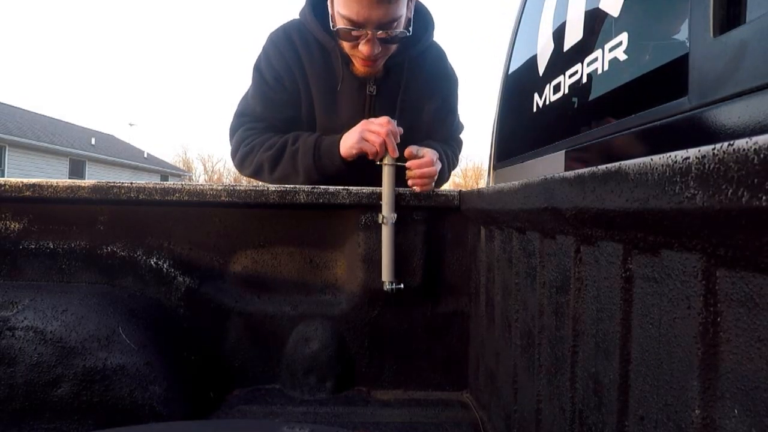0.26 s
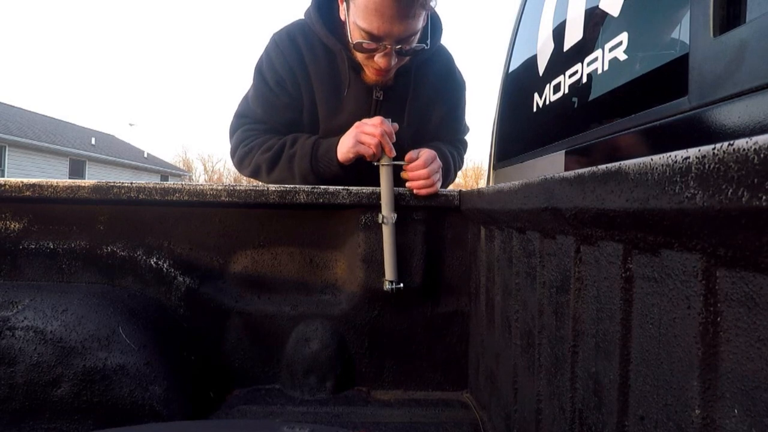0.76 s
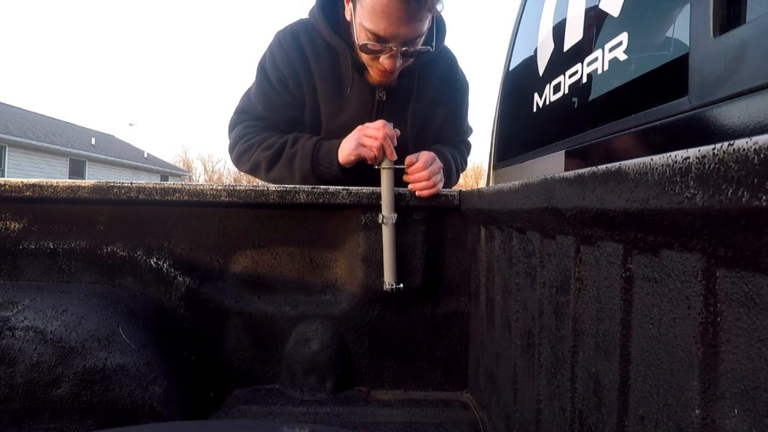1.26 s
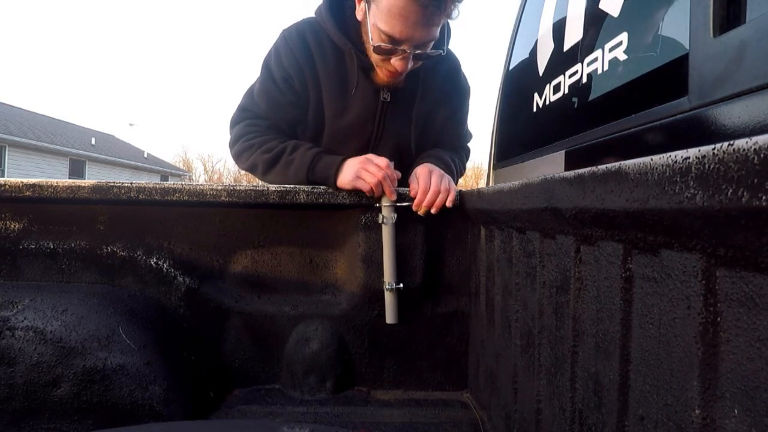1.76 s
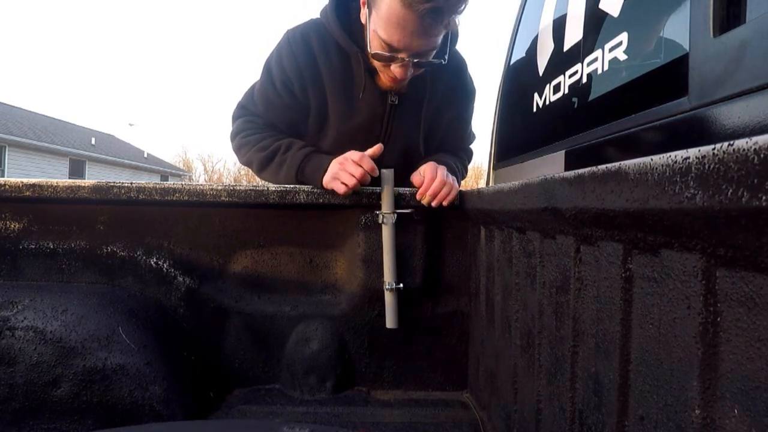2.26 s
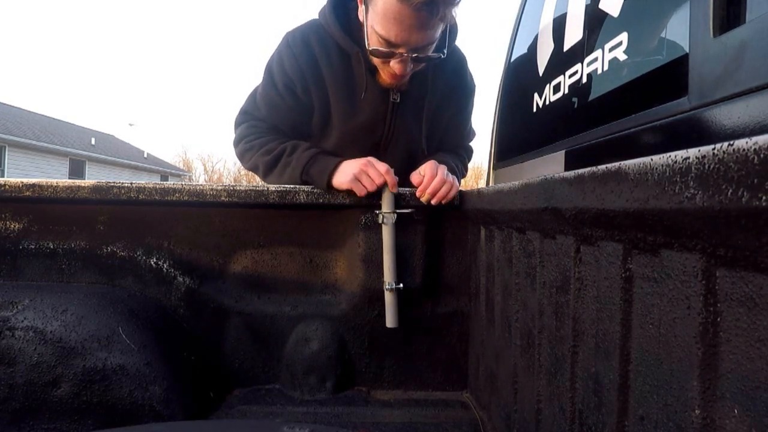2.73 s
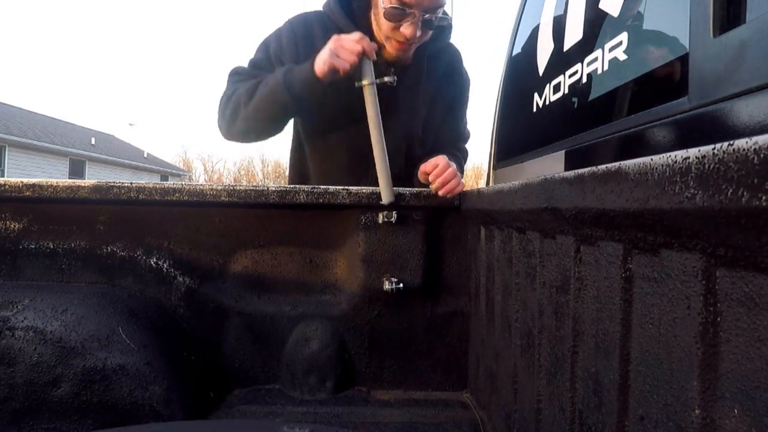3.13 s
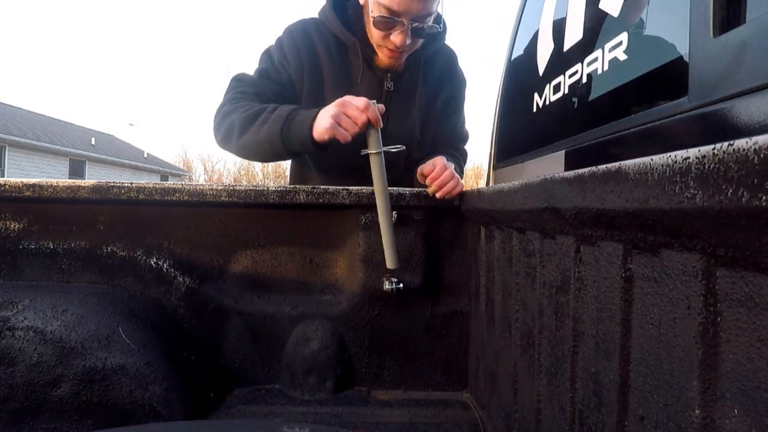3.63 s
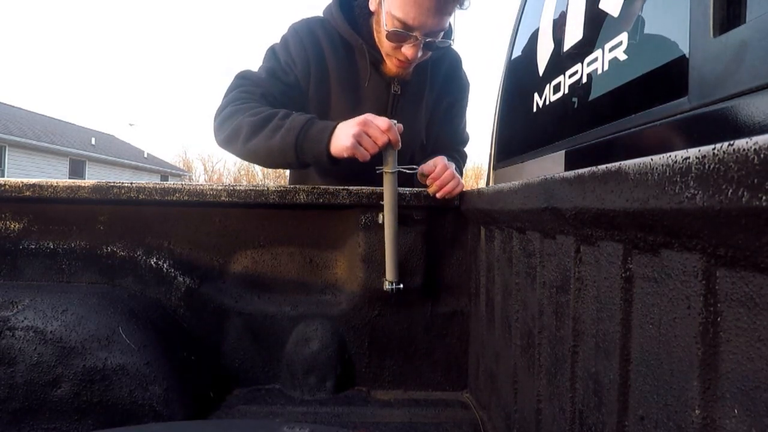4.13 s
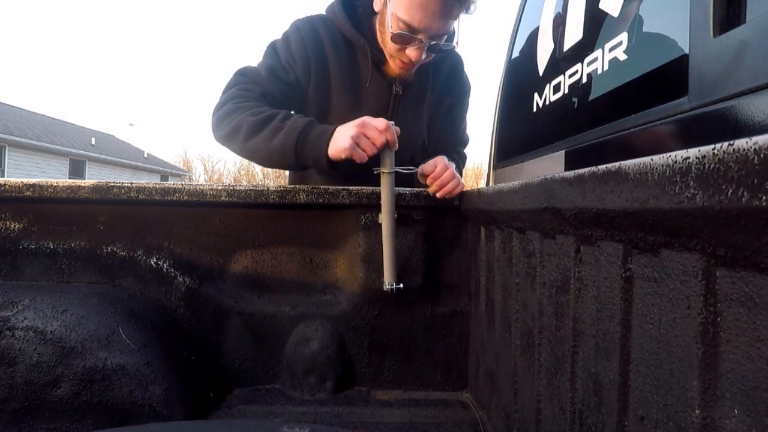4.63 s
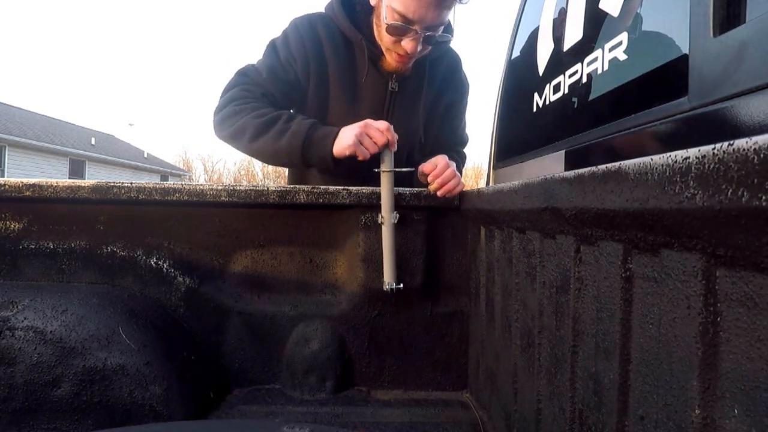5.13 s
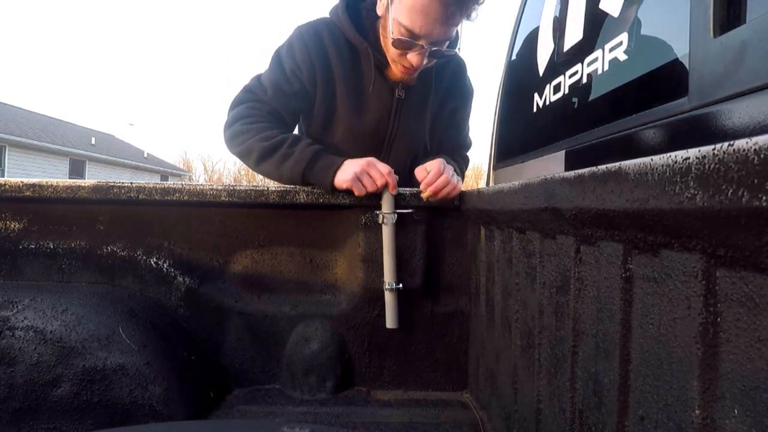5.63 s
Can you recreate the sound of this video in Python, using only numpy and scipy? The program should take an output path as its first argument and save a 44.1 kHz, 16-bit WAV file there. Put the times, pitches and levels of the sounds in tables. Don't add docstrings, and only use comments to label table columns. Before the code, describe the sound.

Irregular pipe knocks, metallic ticks and gritty scrapes resonate in a steel truck bed outdoors, over light wind rumble and faint hum.

```python
import sys
import numpy as np
from scipy import signal
from scipy.fft import rfft, irfft
from scipy.io import wavfile
from scipy.ndimage import uniform_filter1d

SR = 44100
rng = np.random.default_rng(int(sys.argv[2]) if len(sys.argv) > 2 else 0)


def nominal_scale(level):
    x = np.asarray(level, float) / 20
    return 10 ** x


def wrap_up_sound(samples):
    columns = np.atleast_2d(samples).T
    tamed = np.clip(columns, -1, 1)
    steps = np.round(tamed * 32767).astype(np.int16)
    wavfile.write(sys.argv[1], SR, steps)


N = 259308
T = np.arange(N) / SR

# (start_s, level_db)
UPPER_CLAMP_TICKS = [(0.727, -62.5), (0.7841, -83), (0.8776, -63), (1.063, -65), (1.1054, -58.5),
                     (1.5604, -59), (1.6506, -56), (1.8204, -62), (1.854, -57), (1.8724, -33.5),
                     (2.837, -56.5), (2.874, -50.5), (2.933, -50.5), (4.837, -73), (5.4824, -65),
                     (5.5388, -49), (5.6221, -63), (5.29, -50), (5.683, -37)]
# (start_s, level_db)
LOWER_CLAMP_TICKS = [(0.307, -26.5), (1.229, -65), (2.9765, -37), (3.8504, -42.5), (4.1836, -50),
                     (4.1944, -50), (4.239, -43.5), (4.2597, -43.5), (4.288, -53.5), (4.317, -44),
                     (4.488, -57), (4.5337, -55), (4.566, -56.5), (4.6044, -76), (4.6279, -62),
                     (4.9065, -45), (5.1896, -68), (5.238, -34), (5.3473, -54), (5.371, -49.5),
                     (5.682, -39)]


def on_log_axis(table, hz):
    table_hz, value = np.transpose(table)
    return np.interp(np.log(hz), np.log(table_hz), value)


def unit(x):
    return x / np.sqrt(np.mean(x ** 2))


def band(x, lo_hz, hi_hz):
    return signal.sosfilt(signal.butter(2, [lo_hz, hi_hz], "bandpass", fs=SR, output="sos"), x)


def walk(rate):
    hold = int(SR / rate)
    goals = rng.standard_normal(N // hold + 1)
    return 1.1 * uniform_filter1d(np.repeat(goals, hold), hold)[:N]


def ring(hz, size, t60, rise_ms):
    t = T[:int(min(np.max(t60) * 1.4, 0.8) * SR)]
    phase = rng.uniform(0, 2 * np.pi, (len(hz), 1))
    decay_db = -60 * t / t60[:, None]
    tail_db = -23.5 + decay_db / 2.2
    fade = nominal_scale(np.maximum(decay_db, tail_db))
    tones = size @ (np.sin(2 * np.pi * hz[:, None] * t + phase) * fade)
    rise = 1 - np.exp(-1000 * t / rise_ms)
    return tones * rise / np.sqrt(np.sum(size ** 2))


def body(lo_hz, hi_hz, strong, strong_db, rise_ms, count):
    # (pitch_hz, level_db per Hz)
    crowd_colour = [(59, -43), (100, 6), (218, 3.5), (362, -1), (956, -0.5), (1110, -4), (1490, -7.5),
                    (1920, -20.5), (2320, -15), (2990, -21), (3460, -19.5), (5630, -26.5), (6810, -35),
                    (10800, -33), (15500, -51)]
    # (pitch_hz, t60_s)
    ring_times = [(100, 0.73), (200, 0.4), (380, 0.5), (560, 0.27), (800, 0.32), (1300, 0.19), (2500, 0.17),
                  (4850, 0.097), (12800, 0.083)]
    place = (np.arange(count) + rng.random(count)) / count
    first_hz, last_hz = lo_hz / 1.5, min(1.5 * hi_hz, 15600)
    hz = first_hz + place * (last_hz - first_hz)
    skirt = 1 / np.sqrt((1 + (lo_hz / hz) ** 8) * (1 + (hz / hi_hz) ** 8))
    size = skirt * nominal_scale(on_log_axis(crowd_colour, hz) + 2.4 * rng.standard_normal(count))
    size /= np.sqrt(np.sum(size ** 2))
    strong_hz, level_db = np.transpose(strong)
    hz = np.r_[hz, strong_hz]
    size = np.r_[size, nominal_scale(level_db + strong_db)]
    t60 = on_log_axis(ring_times, hz) * rng.uniform(0.75, 1.2, len(hz))
    return ring(hz, size, t60, rise_ms)


def blows(times, db, contact_ms, spot_hz, spot, sharpness):
    length = 4096
    force, t = np.zeros(N + length), T[:length]
    chatters = rng.standard_normal((len(times), length))
    for s, level_db, ms, hz, chatter in zip(times, db, contact_ms, spot_hz, chatters):
        push = chatter * np.abs(chatter) ** 0.85 * np.exp(-1000 * t / max(ms, 0.2))
        push[0] += 8.0
        size = nominal_scale(level_db) / np.sqrt(np.sum(push ** 2))
        peak = signal.iirpeak(hz, max(sharpness, 1), SR)
        push += spot * signal.lfilter(*peak, push)
        start = int(s * SR)
        force[start:start + length] += size * push
    return force[:N]


def wall():
    # (pitch_hz, level_db)
    wall_tones = [(624, 0.5), (770, -9), (800, 3), (938, -11.5), (1030, -12), (1260, -15.5), (1510, -2),
                  (1800, -4.5)]
    return body(550, 1900, wall_tones, -14.5, 0.15, count=200)


def panel():
    # (pitch_hz, level_db)
    panel_tones = [(270, -14), (350, 0), (390, -1), (433, -10)]
    # (pitch_hz, level_db, t60_s)
    hollow_thock = (370, 8.6, 0.026)
    boom = body(240, 490, panel_tones, -13.5, 1.9, count=60)
    hz, db, t60 = hollow_thock
    t = T[:len(boom)]
    return boom + nominal_scale(db - 60 * t / t60) * np.sin(2 * np.pi * hz * t)


def pipe():
    # (pitch_hz, level_db)
    pipe_tones = [(2010, 1), (2240, -2), (2355, -4.5), (2780, -7.5), (3250, -7), (3390, 1), (4010, -2),
                  (4620, 1), (5740, -10.5)]
    return body(1900, 6000, pipe_tones, -20, 0.16, count=380)


def clamp():
    # (pitch_hz, level_db)
    clamp_tones = [(7620, -5), (8130, 0), (8400, 2), (9310, -3), (10580, 3.5), (11350, -8.5),
                   (11750, -12.5)]
    return body(6300, 22000, clamp_tones, -13.5, 0.15, count=420)


def floor():
    # (pitch_hz, level_db)
    floor_tones = [(135, -5.5), (165, -7), (205, 0)]
    return body(105, 240, floor_tones, -1, 2.4, count=24)


def knocks():
    # (start_s, wall_db, boom_over_wall_db, pipe_over_wall_db)
    foot_knocks = [(0.0, -49, 22, 0.5), (0.45, -59, 5.5, -10), (0.622, -70, 10, 0), (0.68, -72, -1, -13),
                   (0.702, -55.5, -12, -17), (1.043, -51, 0.5, -20), (1.065, -43, -12.5, -0.5),
                   (1.124, -43, -29, -6.5), (1.541, -55, 6.5, -9), (1.873, -29.5, 1.5, 2.5),
                   (2.576, -62.5, 3, -37.5), (2.794, -49.5, 3.5, -22), (2.838, -42, -20, -8),
                   (2.886, -42, -16, -3), (2.927, -39, 8, -7.5), (2.978, -33.5, -6.5, -5.5),
                   (3.846, -40, -2.5, -5.5), (3.888, -55, 13.5, -11), (4.028, -60.5, -9, -2.5),
                   (4.558, -42, 3, -11), (4.625, -57, -28, 1.5), (4.709, -65.5, -11, -3),
                   (4.768, -62.5, -12.5, -3.5), (5.347, -34, -10.5, -3), (5.368, -42.5, -3, 1),
                   (5.62, -43.5, -2, -18)]
    # (start_s, wall_db, boom_over_wall_db, pipe_over_wall_db, spot_hz)
    rim_clacks = [(0.219, -51.5, 6, 1, 3880), (0.307, -23, -0.5, -2, 3700), (0.4, -58.5, -4.5, 5, 3560),
                  (0.784, -47.5, -19, 0, 2650), (1.192, -56.5, 4.5, -1, 1820), (4.315, -34, -33, -3, 2150),
                  (4.487, -55, 13.5, 2.5, 1940), (4.837, -66, 13.5, 5.5, 2600),
                  (4.908, -43.5, 1, 2.5, 2310), (5.246, -26.5, -6.5, -0.5, 2160),
                  (2.697, -55, -32, 3, 1576), (5.684, -29.5, -5, -2.5, 1806), (5.54, -49, -12, 0.5, 2340)]
    # (start_s, wall_db, boom_over_wall_db, pipe_over_wall_db, contact_ms)
    skids = [(0.329, -38.5, -19, 4, 6.7), (0.722, -49, 4.5, -0.5, 16), (0.875, -60, 12, 6.5, 6),
             (1.228, -54, -6, 2, 18), (3.049, -30, -25, -3.5, 26), (4.181, -51, 5.5, 1, 19),
             (4.235, -35.5, -6, -8, 9), (4.261, -38.5, 2, -6, 30), (4.529, -55, 13.5, 3.5, 28),
             (5.012, -40, -22, -6.5, 6.2), (5.237, -24.5, -26, -3, 22.5)]
    rows = [(*row, 3.8, 1330) for row in foot_knocks]  # contact_ms, spot_hz
    rows += [(*row[:-1], 5.1, row[-1]) for row in rim_clacks]
    rows += [(*row, 1764) for row in skids]
    return np.transpose(rows)


def thuds():
    # (start_s, level_db, push_ms, spot_hz)
    floor_blows = [(0.0, -27.5, 5.5, 177), (0.312, -34.5, 3.3, 180.5), (0.427, -37, 5.7, 190.5),
                   (0.88, -49, 4.7, 190), (1.08, -41.5, 7.2, 180), (1.546, -38, 4.6, 223),
                   (1.876, -32, 3, 173.4), (2.19, -53.5, 5.3, 121), (2.933, -43.5, 20, 203),
                   (3.05, -37.5, 6.2, 172), (3.844, -44, 12, 204), (4.188, -57, 4.4, 212),
                   (4.243, -32.5, 2.1, 200), (4.318, -36.5, 3.2, 204), (4.559, -50, 7.2, 200),
                   (4.919, -39.5, 19, 223.5), (5.249, -24, 4.7, 188), (5.316, -43, 3.6, 199),
                   (5.699, -34.5, 11, 222)]
    return np.transpose(floor_blows)


def slips(rate, scatter_db, patchy_db):
    happens = rng.random(N) < rate / SR
    clicks = happens * rng.standard_normal(N) * nominal_scale(scatter_db * rng.exponential(1, N))
    return unit(clicks * nominal_scale(patchy_db * walk(45)))


def slide_curves():
    # (start_s, hardest_s, end_s, wall_db when hardest, brightness_db)
    strokes = [(0.0, -0.016, 0.12, -43.5, -1), (0.084, 0.265, 0.44, -48.5, 2.5),
               (0.676, 0.735, 0.89, -51, -3.5), (1.05, 1.081, 1.39, -49, -3.5),
               (1.359, 1.415, 1.574, -56.5, -1.5), (1.524, 1.634, 1.75, -48, 1),
               (1.751, 1.853, 1.87, -46.5, 3), (2.822, 2.9, 3.07, -45, 3), (2.953, 3.076, 3.26, -38, 3),
               (3.842, 3.879, 3.951, -43.5, 3), (4.005, 4.045, 4.23, -64, -4),
               (4.176, 4.192, 4.26, -40, -1), (4.24, 4.256, 4.32, -41.5, 10.5),
               (4.321, 4.344, 4.42, -44.5, 7), (4.496, 4.578, 4.78, -52, -5.5),
               (4.715, 4.802, 8.2, -71, -7), (5.11, 5.224, 5.23, -47, -1.5), (5.258, 5.275, 5.144, -36, 9),
               (5.44, 5.526, 5.55, -44, 1.5), (5.604, 5.647, 5.653, -42, 6), (5.807, 5.798, 6.1, -62, -6),
               (5.851, 5.884, 5.888, -55.5, 8)]
    # (over_wall_db when hardest, share of the wall's swell, share of the brightness)
    part_shares = [
        (0, 0.74, -0.78),
        (-4, 1.38, .9),
        (-17.5, 0.98, 0.63),
    ]
    start_db, end_db = -11, -29.5
    roundness = 1.28
    gain = np.zeros((4, N))
    for start, hardest, end, wall_db, bright_db in strokes:
        fade = np.clip(np.minimum(T - start, end - T) / 0.0051, 0, 1)
        away = np.interp(T, [start, hardest, end], [-1, 0, 1])
        swell_db = np.where(away < 0, start_db, end_db) * np.abs(away) ** roundness
        for k, (db, follow, tilt) in enumerate([(0.0027, 1, 0.013), *part_shares]):
            gain[k] += fade * nominal_scale(wall_db + db + follow * swell_db + tilt * bright_db)
    return gain


def ticks():
    rows = [(*row, 7690) for row in UPPER_CLAMP_TICKS]
    rows += [(*row, 11000) for row in LOWER_CLAMP_TICKS]
    s, db, hz = np.transpose(rows)
    rattle_ms = 1.7 + 0.16 * (db + 63)
    return s, db, rattle_ms, hz * (1 + 0.03 * rng.standard_normal(len(s)))


def truck_bed():
    parts = [wall(), panel(), pipe(), clamp(), floor()]
    s, wall_db, boom_db, pipe_db, contact_ms, spot_hz = knocks()
    hits = [blows(s, wall_db + over_db, contact_ms, spot_hz, 1.0, 5.1) for over_db in (0, boom_db, pipe_db)]
    hits.append(blows(*ticks(), 2.2, 28.0))
    hits.append(blows(*thuds(), 2.0, 10.0))
    rub = slips(2200, 3.3, 1.5)
    gains = slide_curves()
    gains = [*gains, 0.9 * gains[1]]
    out = 0
    for part, hit, gain in zip(parts, hits, gains):
        drag = gain * rub / np.sqrt(np.sum(part ** 2))
        out = out + signal.oaconvolve(1.047 * hit + 0.68 * drag, part)[:N]
    return out


def wind():
    # (time_s, pressure_db)
    gusts = [(0.0, -39), (0.21, -24), (0.36, -44.5), (0.6, -38.5), (0.76, -43.5), (0.95, -30.5),
             (1.28, -25.5), (1.36, -32.5), (1.44, -24), (1.65, -32), (1.74, -24), (1.98, -41), (2.1, -34),
             (2.5, -39), (2.8, -31), (3.03, -54.5), (4.19, -43), (5.88, -55)]
    # (start_s, level_db, t60_s)
    jolt = (5.25, -34.5, 0.6)
    pressure_db = np.interp(T, *np.transpose(gusts))
    swing = unit(band(band(rng.standard_normal(N), 3.9, 15.0), 4.7, 15.0))
    swing /= np.sqrt(uniform_filter1d(swing ** 2, SR // 5)) + 0.66
    flutter = unit(band(band(rng.standard_normal(N), 20, 70), 20, 70)) * nominal_scale(0.52 * walk(5.6))
    s, db, t60 = jolt
    shake = nominal_scale(-53 + 0.4 * (pressure_db + 37))
    shake += (T > s) * nominal_scale(db - 60 * np.abs(T - s) / t60)
    return nominal_scale(pressure_db + 5) * swing + shake * flutter


def air():
    # (pitch_hz, level_db per Hz)
    hum_colour = [(53, -31), (90, -0.5), (151, -5), (248, -16.5), (1140, -32.5), (1840, -36), (2430, -38.5),
                  (4160, -41), (15500, -50.5)]
    # (time_s, level_db)
    hum_swell = [(0, 3.5), (2.3, 1.5), (2.6, 4.5), (3.3, 6), (3.8, 3.5), (5.88, 4.5)]
    hz = np.maximum(np.fft.rfftfreq(N, 1 / SR), 1)
    colour = nominal_scale(on_log_axis(hum_colour, hz)) * (hz > 85)
    noise = unit(irfft(rfft(rng.standard_normal(N)) * colour, N))
    level_db = -66.5 + np.interp(T, *np.transpose(hum_swell)) + 1.0 * walk(4)
    return noise * nominal_scale(level_db)


def snaps():
    s, db = np.transpose([*UPPER_CLAMP_TICKS, *LOWER_CLAMP_TICKS])
    contacts = np.zeros(N)
    contacts[(s * SR).astype(int)] = nominal_scale(db - 2)
    burst = rng.standard_normal(256) * np.exp(-T[:256] / 0.0006)
    return band(signal.oaconvolve(contacts, burst)[:N], 9000, 15600)


def groans():
    # (start_s, end_s, from_hz, to_hz, width_hz, level_db)
    glides = [
        (2.79, 2.87, 520, 680, 90, -52),
        (5.13, 5.24, 1050, 1400, 600, -54),
        (3.63, 3.73, 540, 550, 40, -73),
    ]
    out = 0
    for start, end, from_hz, to_hz, width, db in glides:
        along = np.clip((T - start) / (end - start), 0, 1)
        turn = 2 * np.pi * np.cumsum(from_hz + (to_hz - from_hz) * along) / SR
        rough = walk(width) * np.sin(turn) + walk(width) * np.cos(turn)
        out = out + nominal_scale(db) * np.sin(np.pi * along) * rough
    return out


def pin():
    # (start_s, pitch_hz, width_hz, level_db, t60_s)
    pin_hum = (3.21, 3330, 70, -77, .8)
    s, hz, width, db, t60 = pin_hum
    hum = unit(band(rng.standard_normal(N), hz - width, hz + width))
    return hum * (T > s) * nominal_scale(db - 60 * np.abs(T - s) / t60)


def scene():
    return (truck_bed() + wind() + air() + snaps() + groans() + pin())[None, :]


def top_cut(x):
    return signal.sosfilt(signal.butter(12, 15690, fs=SR, output="sos"), x)


def record(dry):
    return top_cut(dry)


dry = scene()
out = record(dry)
wrap_up_sound(out)
```